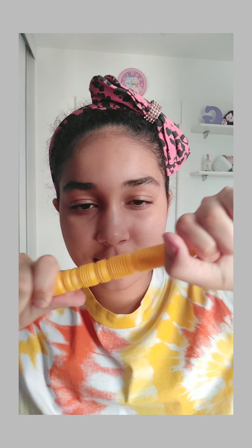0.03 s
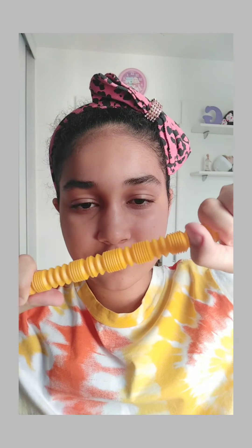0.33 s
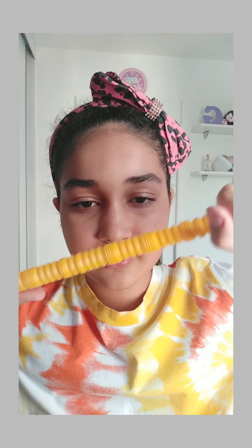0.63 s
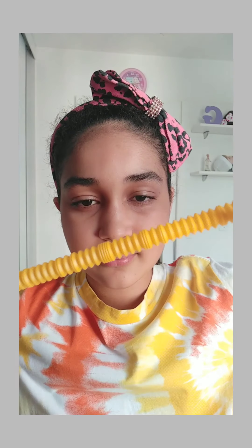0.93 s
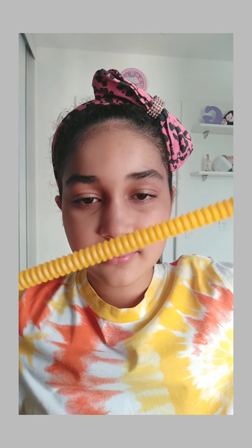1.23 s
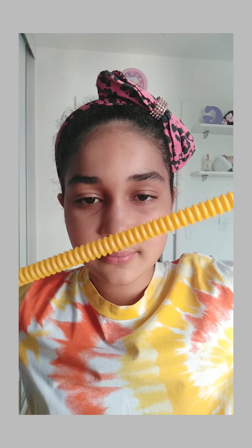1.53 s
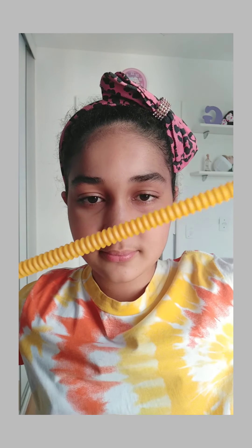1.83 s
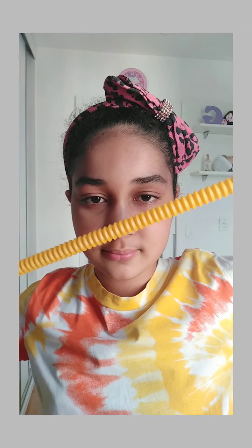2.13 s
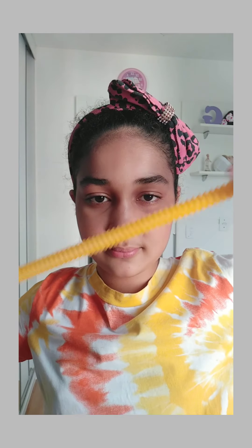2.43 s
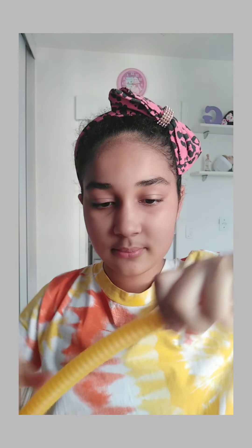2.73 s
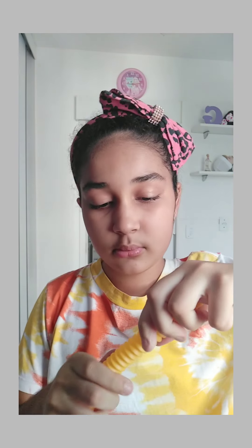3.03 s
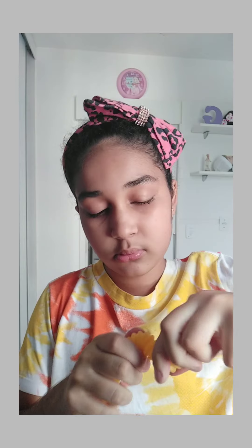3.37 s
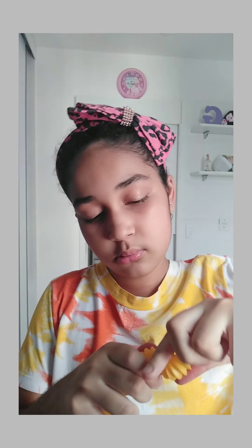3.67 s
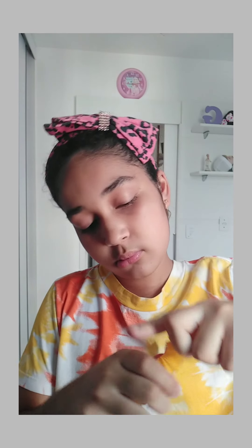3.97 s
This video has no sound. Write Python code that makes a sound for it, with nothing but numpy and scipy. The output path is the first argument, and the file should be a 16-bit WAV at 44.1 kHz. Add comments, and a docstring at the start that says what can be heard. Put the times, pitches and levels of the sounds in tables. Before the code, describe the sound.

Bright, hollow pops run quickly from a ribbed plastic tube being stretched nearby in a small quiet room, dropping in pitch and slowing. After faint finger rubbing, a few thinner, higher pops sound as it is pushed shut.

```python
"""A quick run of bright, hollow pops: a corrugated plastic tube is pulled open in a small quiet room.
Each fold buckles with a crack, rings the thin wall for a few milliseconds and excites the air column,
whose pitch falls as the tube lengthens. The pops thin out and fingers rustle on the ribs;
then a few folds are pushed shut, and the shorter column sounds higher again."""
import sys
import numpy as np
from scipy import signal
from scipy.fft import rfft, irfft
from scipy.io import wavfile
from scipy.ndimage import uniform_filter1d

SR = 44100
rng = np.random.default_rng(int(sys.argv[2]) if len(sys.argv) > 2 else 0)


def transcribe(signal):
    """Save signal, clipped to [-1, 1], as a 16-bit WAV file at the path in sys.argv[1]."""
    frames = np.atleast_2d(signal).T
    limited = np.clip(frames, -1, 1)
    pcm = np.round(limited * 32767).astype(np.int16)
    wavfile.write(sys.argv[1], SR, pcm)


N = 176400
LEAD = 4410  # samples of margin before time zero
T = np.arange(-441, 8000) / SR  # time around one snap [s]
AFTER = np.maximum(T, 0)
PUSH_FROM_S = 3  # folds are pulled open before this and pushed shut after
ROOM_DB = -3.5  # level sent to the room


def tube(places=5, air_room_db=-9, pan_db=0.52, bass_cut_hz=220):
    """Superposition: each fold sounds crack, wall and air, and reaches the room by one of several paths."""
    # folds (time [s], crack level [dB], wall level [dB], wall pitch [Hz], air level [dB]), before trims
    pops = [(-0.012, -12, -11.5, 2820, -23), (0.0548, -15, -12.5, 2730, -30.5),
            (0.1127, -16.5, -11.5, 2600, -40.5), (0.1391, -16, -17, 2730, -27),
            (0.1769, -15.0, -15.5, 2760, -35), (0.2008, -12, -19.5, 2210, -36),
            (0.2334, -13.0, -15.5, 2000, -32), (0.275, -14.5, -13, 3100, -34.5),
            (0.3234, -13, -13, 2540.0, -31.5), (0.3838, -11, -10.5, 2365, -25.5),
            (0.4166, -13, -19.5, 2600, -39), (0.4569, -14.0, -12.5, 2440, -46.0),
            (0.5356, -14.5, -13.5, 2520, -38.5), (0.5796, -11.5, -12, 2560, -26.5),
            (0.6085, -13, -14, 1770, -26.5), (0.62, -14.5, -15, 2640.0, -31),
            (0.645, -14.5, -13, 2606, -31.5), (0.6742, -15.0, -16, 2200, -46.5),
            (0.7254, -14.5, -16.5, 1910, -32.5), (0.7753, -16, -18.5, 2120, -36),
            (0.7945, -20.5, -18, 2080, -33), (0.8354, -11.5, -11.5, 2940, -35),
            (0.8695, -18, -12, 1880, -29.0), (0.8914, -11.0, -20.5, 2420, -37),
            (0.935, -10.5, -24.5, 1840, -30), (0.9778, -12.0, -13.5, 2200, -35.5),
            (1.0111, -12.5, -26.5, 2420, -39.5), (1.0348, -15.5, -17, 2660.0, -33),
            (1.0695, -13, -21.5, 2070.0, -42), (1.1015, -13.5, -15, 2330, -26),
            (1.1343, -11, -13, 2600, -28), (1.147, -23.5, -21.5, 2060, -40), (1.1902, -9.5, -30, 2520, -32),
            (1.1955, -12.5, -16.5, 2510, -31), (1.2183, -10, -20.5, 2680, -37.5),
            (1.2415, -12.5, -24, 2440.0, -31.5), (1.2732, -12.5, -30.5, 2720, -35),
            (1.3018, -19, -21, 2100, -32.5), (1.3283, -9.5, -29, 2800, -41.5),
            (1.3498, -13.5, -22, 2520, -32.5), (1.4065, -24.5, -24, 2300, -31),
            (1.4474, -12.0, -20, 2910, -31), (1.552, -28.5, -29.5, 2080, -36),
            (1.7219, -16.5, -19, 1895, -31), (1.7422, -18, -27.0, 2500, -33),
            (1.8724, -28.5, -32, 1545, -34), (2.1406, -28, -29.5, 2374, -41.5),
            (3.3736, -14, -44, 1912, -53), (3.3838, -14.5, -25, 1820, -35.0),
            (3.3981, -13, -29, 1400.0, -31.5), (3.4223, -19.5, -21.5, 1700, -33.5),
            (3.6712, -23, -23.0, 1244, -36), (3.7148, -17.5, -27, 1590, -34),
            (3.867, -24, -21.5, 2100, -41)]
    # spectrum of a pulled fold's crack (frequency [Hz], gain [dB])
    crack_spectrum = [(250, -18.5), (750, -7), (1800, -7), (4800, -5.5), (7500, -2), (9400, 0.5),
                      (10300, -9), (12000, -19), (16000, -29.5)]
    # added tilt that makes a pushed fold sound thinner (frequency [Hz], gain [dB])
    push_tilt = [(500, 2), (1800, 1), (4300, -0.5), (8000, 1), (12500, 9.5)]
    # a finger knocks softly on the wall (time [s], level [dB], pitch [Hz])
    knocks = [(2.693, -54, 1450)]
    # a fingernail slips over a rib (time [s], level [dB])
    rib_ticks = [(2.52, -56)]
    crack_trim_db, wall_trim_db, air_trim_db = -1, -1.5, 7
    pulled = minimum_phase(crack_spectrum)
    pushed = convolve(pulled, minimum_phase(push_tilt))
    direct, sent = np.zeros((2, LEAD + N)), np.zeros((places, 2, LEAD + N))
    for k, (s, crack_db, wall_db, wall_hz, air_db) in enumerate(pops):
        fold = crack(pushed, creak_s=0.003) if s > PUSH_FROM_S else crack(pulled)
        snap = amp(crack_trim_db + crack_db) * fold + amp(wall_trim_db + wall_db) * wall_ring(wall_hz)
        hollow = amp(air_trim_db + air_db) * air_column(s)
        pan = amp(pan_db * rng.standard_normal() * np.array([[1], [-1]]))
        add(direct, s, (snap + hollow) * pan)
        add(sent[k % places], s, amp(ROOM_DB) * snap + amp(air_room_db) * hollow)
    for s, db, hz in knocks:
        knock = amp(db) * wall_ring(hz)
        add(direct, s, knock)
        add(sent[0], s, knock)
    for s, db in rib_ticks:
        add(direct, s, amp(db) * crack(pushed))
    heard = direct + sum(convolve(part, room_response()) for part in sent)
    bass_cut = signal.butter(2, bass_cut_hz, "high", fs=SR, output="sos")
    return signal.sosfilt(bass_cut, heard)[:, LEAD:]


def crack(colour, creak_s=0.00067, rise_s=0.00067, fall_s=0.0011, shiver_s=0.0051):
    """Snap-through buckling: a fold creaks, gives way between two small slips, and shivers."""
    creak_db, slip_db, shiver_db = -23, -13, -20.5
    stretch = np.exp(0.3 * rng.uniform(-1, 1))  # some folds give way faster than others
    early_s, late_s = rng.random(2) * [.002, .005]
    power = 0
    for s, db in [(0, 0), (-early_s, slip_db), (late_s, slip_db)]:
        t = (T - s) / stretch
        power += (amp(db) * np.exp(np.minimum(t, 0) / rise_s - np.maximum(t, 0) / fall_s)) ** 2
    creak = amp(creak_db) * np.exp(np.minimum(T, 0) / creak_s)
    shiver = amp(shiver_db) * np.exp(-AFTER / shiver_s)
    envelope = np.sqrt(power + np.where(T < 0, creak, shiver) ** 2)
    noise = stereo_noise(len(T), correlation=0.12) * envelope
    return set_energy(convolve(noise, colour), 0.0032)


def wall_ring(hz, rise_s=0.00032, sag=0.47, sag_s=0.00096, spread_db=2.5, stereo_delay_s=0.00007):
    """Damped free vibration: the thin wall's modes ring, sagging to their pitch as the fold relaxes."""
    # bending modes (ratio to the wall pitch, relative level [dB], 60 dB decay time [s])
    wall_modes = [(0.58, -2, 0.0056), (0.791, -1.5, 0.009), (1, -4.5, 0.011), (1.2, -4.5, 0.0055)]
    ring = 0
    for ratio, db, t60 in wall_modes:
        t = np.maximum(T + rise_s + stereo_delay_s * rng.standard_normal((2, 1)), 0)
        mode_hz = hz * ratio * (1 + 0.022 * rng.standard_normal())
        turns = mode_hz * (t + sag * sag_s * (1 - np.exp(-t / sag_s)))
        mode_db = db + spread_db * rng.standard_normal()  # each fold favours other modes
        envelope = (1 - np.exp(-t / rise_s)) * amp(mode_db - 60 * t / t60)
        ring += envelope * np.sin(2 * np.pi * (turns + rng.random()))
    return set_energy(ring, 0.0045)


def air_column(s, rise_s=0.0014, spread_db=2, detune=0.0046, reference_hz=370, cutoff_hz=329):
    """Standing waves: a pulse bounces along the tube in near-harmonic modes, dying sooner if it is short."""
    # fundamental, set by the tube's length (time [s], frequency [Hz])
    column_pitch = [(.05, 628), (.28, 523), (.39, 500), (.6, 419.2), (1, 348), (1.42, 306.5), (2.1, 292.8),
                    (3.38, 365.2), (3.75, 373.5)]
    # modes (multiple, pulled level [dB], pushed level [dB], 60 dB decay time at reference_hz [s])
    air_modes = [(1, 2.5, 2, 0.098), (2.01, -10.5, 3, 0.096), (3.03, -3, 4.5, 0.07),
                 (4.02, -5, -6.5, 0.089), (5.01, -11, 2.5, 0.061), (6.05, -8.5, 3.5, 0.073),
                 (7.1, -7, -0.5, 0.041)]
    hz, ring = np.interp(s, *np.transpose(column_pitch)), 0
    for multiple, pulled_db, pushed_db, t60 in air_modes:
        level_draw, pitch_draw = rng.standard_normal(2)
        db = pushed_db if s > PUSH_FROM_S else pulled_db
        if multiple > 1:
            db += spread_db * level_draw  # the mix of overtones depends on the fold
        dispersion = 0.0099 * multiple ** 2  # the ribs spread the pulse
        stereo_phase = 0.039 * multiple * rng.standard_normal((2, 1))
        turns = hz * multiple * (1 + detune * pitch_draw) * AFTER - dispersion + stereo_phase
        # the narrow mouth hardly radiates below the cutoff
        radiated = 1 / np.sqrt(1 + (cutoff_hz / (hz * multiple)) ** 20)
        decay_db = 60 * AFTER / t60 * np.sqrt(hz / reference_hz)
        ring += radiated * amp(db - decay_db) * np.cos(2 * np.pi * turns)
    return ring * (1 - np.exp(-AFTER / rise_s))


def fingers(grains_per_s=2000, grain_db=1.5, catch_db=3, catch_s=0.018):
    """Stick-slip friction: skin slides over the ribs in tiny grains, catching as it goes."""
    # strength of the rubbing (time [s], level [dB])
    rub_level = [(1.981, -81.5), (2.007, -49.5), (2.069, -81), (2.399, -83), (2.55, -62.5), (2.64, -70.5),
                 (2.719, -55), (2.92, -74.5), (3.1, -56.5), (3.2, -82)]
    # spectrum of skin on plastic (frequency [Hz], relative level [dB])
    rub_spectrum = [(1400, -13.5), (4800, -13.5), (7500, -5), (9400, 3.5), (11000, -8.5), (16000, -17)]
    strength = amp(grain_db * np.minimum(rng.exponential(1, N), 4))
    slips = rng.random(N) < grains_per_s / SR
    grains = strength * slips * stereo_noise(N, correlation=0.42)
    catching = amp(catch_db * unit_rms(uniform_filter1d(rng.standard_normal(N), round(catch_s * SR))))
    envelope = amp(np.interp(np.arange(N) / SR, *np.transpose(rub_level)))
    rub = unit_rms(tint(grains * catching, rub_spectrum)) * envelope
    return rub + amp(ROOM_DB) * convolve(rub, room_response())


def room_response(gap_s=0.002, early_db=-5, early_s=0.0092, echoes_per_s=1500, coherent_hz=750):
    """Reverberation: near reflections from face and hands, then the diffuse tail of a small room."""
    # reverberation time (frequency [Hz], 60 dB decay time [s])
    room_t60 = [(400, 0.384), (1800, 0.2624), (9000, 0.2971), (15000, 0.2155)]
    # spectrum at the start of the tail (frequency [Hz], relative level [dB])
    room_colour = [(1500, -0.43), (5000, -1.4), (12000, 0.17)]
    size = SR // 2
    t = np.arange(size) / SR
    hz, frame_s, spectra = signal.stft(rng.standard_normal((2, size)), SR, nperseg=256)
    decay = amp(curve(room_colour, hz)[:, None] - 60 * frame_s / curve(room_t60, hz)[:, None])
    tail = signal.istft(spectra * decay, SR, nperseg=256)[1][:, :size]
    echoes = rng.standard_normal((2, size)) * (rng.random((2, size)) < echoes_per_s / SR)
    early = set_energy(echoes * np.exp(-t / early_s) * (t > gap_s), 1 / SR)
    left, other = rfft(set_energy(tail * (t > gap_s), 1 / SR) + amp(early_db - ROOM_DB) * early)
    # long waves reach both channels alike
    coherence = np.exp(-(np.fft.rfftfreq(size, 1 / SR) / coherent_hz) ** 2 / 2)
    right = coherence * left + np.sqrt(1 - coherence ** 2) * other
    return irfft(np.array([left, right]), size)


def room_tone(level_db=-56):
    """Stationary noise: the steady low murmur of the air in the room."""
    # ambient spectrum (frequency [Hz], relative level [dB])
    murmur_spectrum = [(15, -1), (35, -1), (110, -16.5), (172, -2.5), (400, -14), (1200, -27.5),
                       (4500, -39.5), (9200, -44.5), (16000, -54.5)]
    return amp(level_db) * unit_rms(tint(stereo_noise(N, correlation=0.65), murmur_spectrum))


def amp(db):
    return 10 ** (np.asarray(db) / 20)


def unit_rms(x):
    return x / np.sqrt(np.mean(x ** 2) + 1e-20)


def curve(points, hz):
    """Interpolation on a logarithmic frequency axis."""
    f, value = np.transpose(points)
    return np.interp(np.log(hz + 1), np.log(f + 1), value)


def add(mix, s, sound):
    """Superposition of a sound on the clock T onto the mix at time s."""
    part = mix[:, LEAD + round((s + T[0]) * SR):][:, :sound.shape[1]]
    part += sound[:, :part.shape[1]]


def set_energy(x, seconds):
    """Normalisation to the energy of a unit-RMS signal of that duration."""
    return x * np.sqrt(seconds * SR / (x ** 2).sum(1).mean())


def stereo_noise(size, correlation):
    """Partial correlation: left and right share part of their noise."""
    noise = rng.standard_normal((3, size))
    return np.sqrt(correlation) * noise[0] + np.sqrt(1 - correlation) * noise[1:]


def minimum_phase(spectrum):
    """Causal impulse response: the phase follows from the Hilbert transform of the log gain."""
    log_gain = np.log(amp(curve(spectrum, abs(np.fft.fftfreq(2048, 1 / SR)))))
    return np.fft.ifft(np.exp(np.conj(signal.hilbert(log_gain)))).real[None, :1024]


def convolve(x, response):
    return signal.fftconvolve(x, response, axes=1)[:, :x.shape[1]]


def tint(x, spectrum):
    """Zero-phase filtering gives a long noise its spectrum."""
    gain = amp(curve(spectrum, np.fft.rfftfreq(x.shape[1], 1 / SR)))
    return irfft(rfft(x) * gain, x.shape[1])


def scene():
    """The pressures of tube, fingers and room tone add linearly."""
    return tube() + fingers() + room_tone()


def record(dry):
    """Soft saturation rounds the loudest peaks; a low-pass filter then limits the band."""
    ceiling, edge_hz = 1.2, 15950
    rounded = dry / (1 + (dry / ceiling) ** 6) ** (1 / 6)
    low_pass = signal.firwin(255, edge_hz, window=("kaiser", 8), fs=SR)
    return signal.oaconvolve(rounded, low_pass[None], "same")


dry = scene()
out = record(dry)
transcribe(out)
```